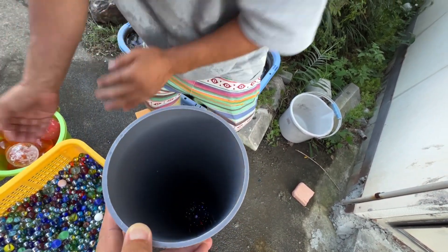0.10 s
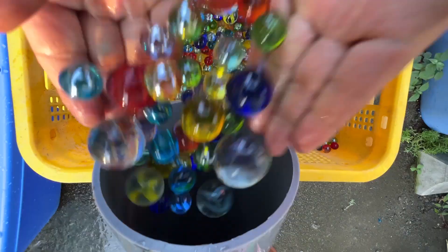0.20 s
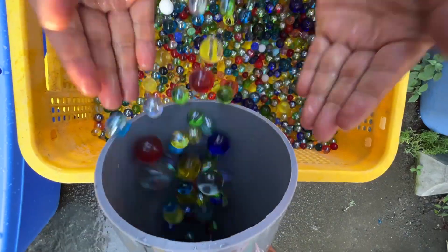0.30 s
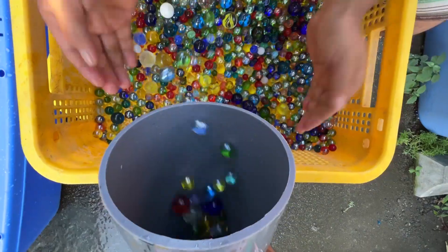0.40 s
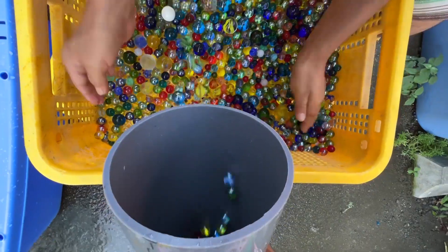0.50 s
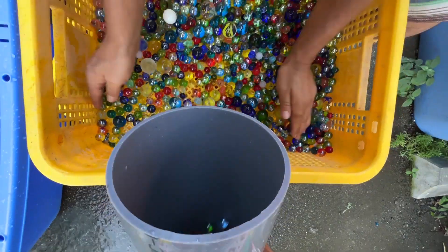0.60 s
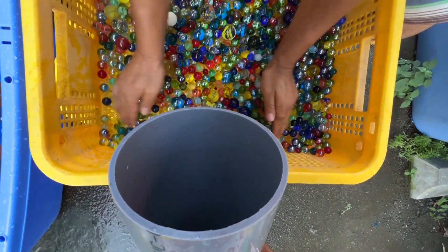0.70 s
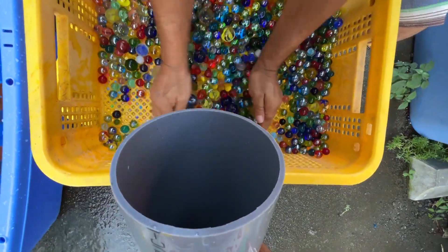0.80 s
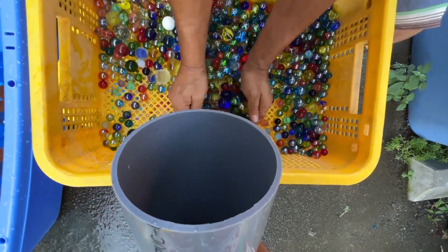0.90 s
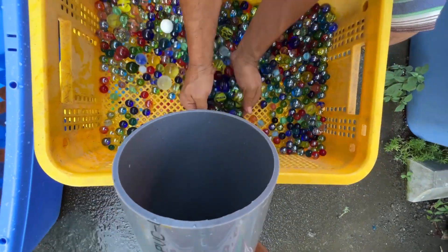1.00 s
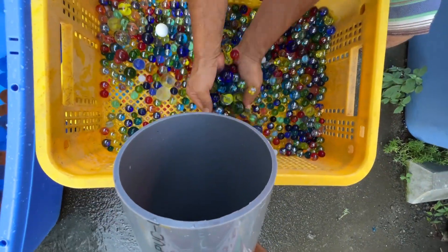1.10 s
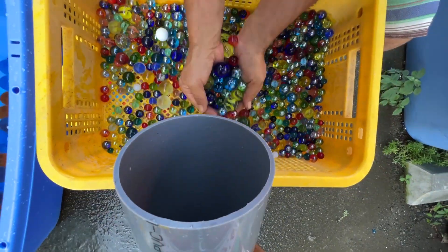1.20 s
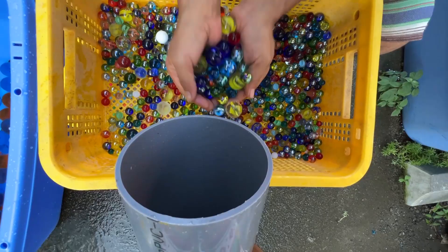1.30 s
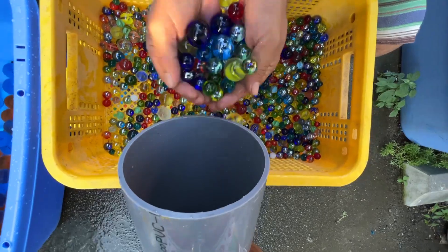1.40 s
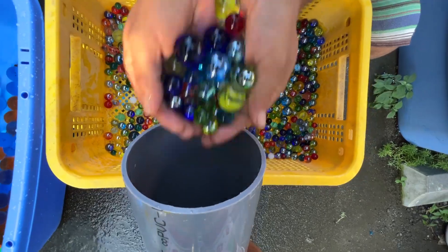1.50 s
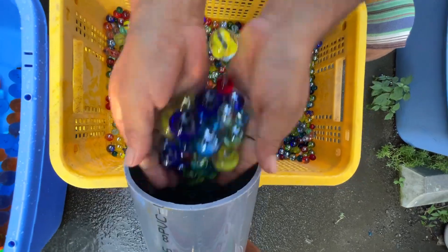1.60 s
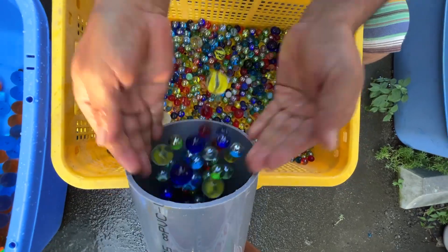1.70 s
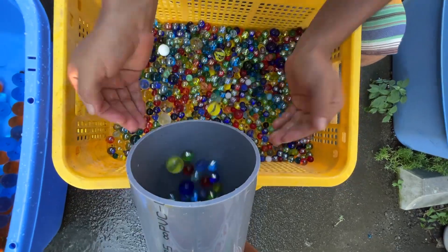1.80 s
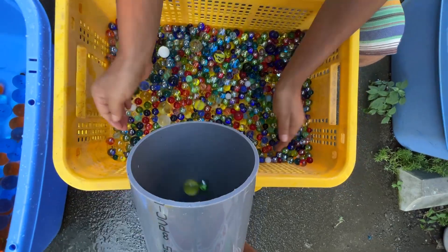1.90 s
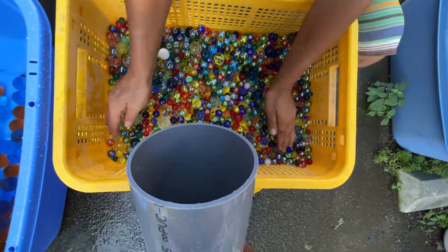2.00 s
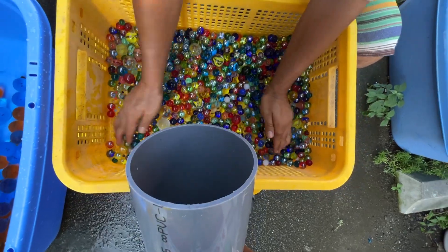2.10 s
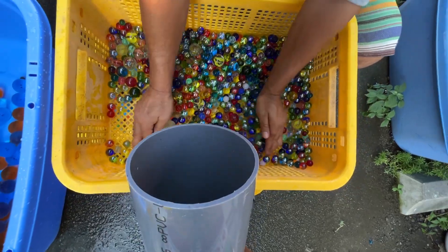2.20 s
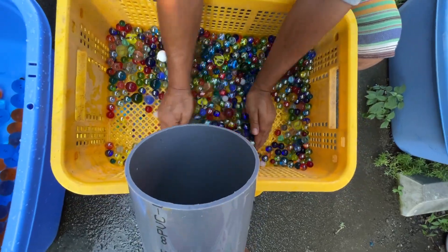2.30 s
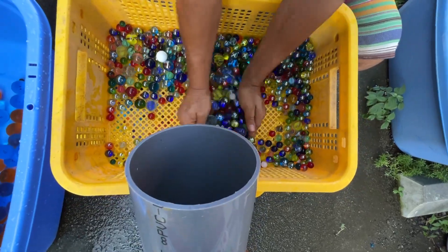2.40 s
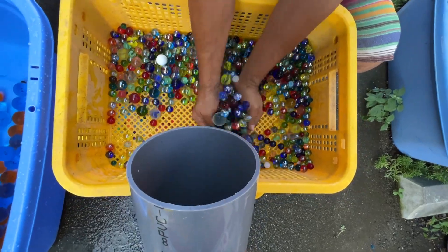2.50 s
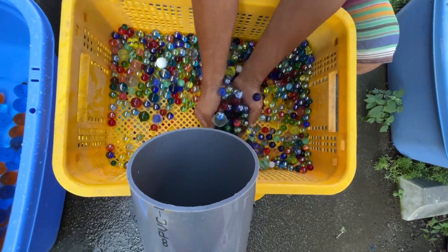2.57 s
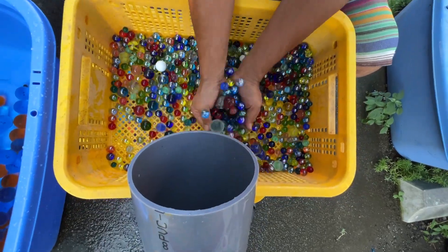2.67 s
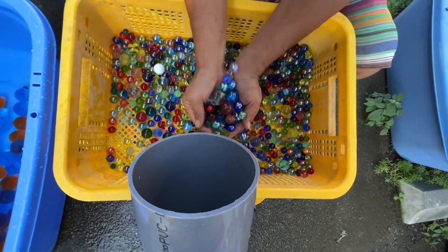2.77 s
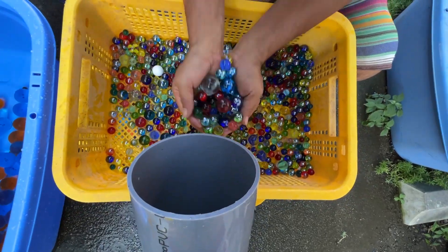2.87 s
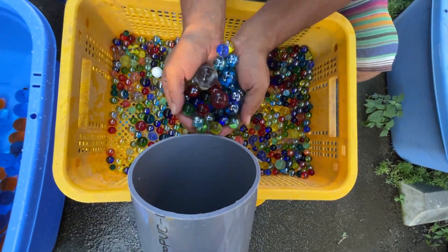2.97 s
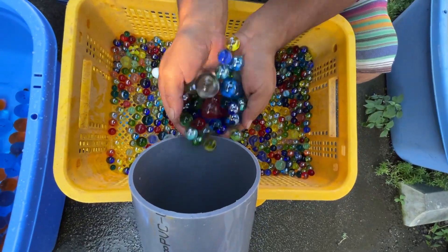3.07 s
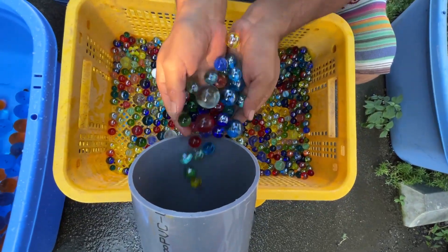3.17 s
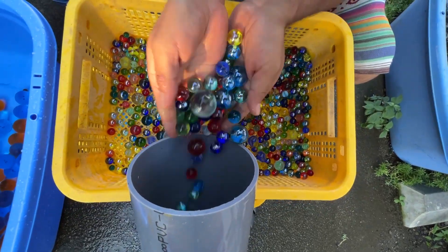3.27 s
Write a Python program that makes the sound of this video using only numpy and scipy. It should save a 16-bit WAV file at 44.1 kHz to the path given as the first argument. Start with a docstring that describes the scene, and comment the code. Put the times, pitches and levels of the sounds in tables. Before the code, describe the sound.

Glass marbles clatter down a plastic pipe and click as hands scoop more from a basket.

```python
"""Glass marbles clatter down a long plastic pipe, two handfuls, striking the wall and each other.
Hands rake more marbles in a plastic basket: glass clicks, the wall rattles, the floor rings.
Ahead of all this, a few marbles rattle far down the pipe, coloured by its air column, then a short silence.
Each source is a spray of hard clicks from several directions, with short tails of near reflections.
Dull knocks, a low rumble and a faint hum sit under the handfuls and the raking."""
import sys
import numpy as np
from scipy import signal
from scipy.fft import rfft, irfft, next_fast_len
from scipy.io import wavfile

SR = 44100
rng = np.random.default_rng(int(sys.argv[2]) if len(sys.argv) > 2 else 0)


def transcribe(u):
    """Save the signal u as a 16-bit wav file named by the first command-line argument.

    u: samples, shape (n,) or (channels, n), limited to [-1, 1]; the rate is SR.
    q: integer samples, one column per channel.
    """
    v = np.clip(np.atleast_2d(u).T, -1, 1)
    q = np.round(v * 32767).astype(np.int16)
    wavfile.write(sys.argv[1], SR, q)


N = 145530
TIME = np.arange(N) / SR
SIZE = next_fast_len(N + SR // 2)
HZ = np.maximum(np.arange(SIZE // 2 + 1) * SR / SIZE, 1)

# Clatter envelopes, one per handful: (time [s], level [dB])
HANDFULS = [
    [(0.232, -67), (0.241, -33), (0.276, -28), (0.286, -46), (0.297, -44), (0.314, -28), (0.322, -15.5),
     (0.39, -25), (0.398, -19), (0.41, -22), (0.43, -25), (0.438, -17), (0.49, -24.5), (0.52, -21),
     (0.71, -31), (0.726, -25.5), (0.768, -39), (0.8, -36)],
    [(1.742, -56), (1.745, -26), (1.756, -40), (1.778, -20), (1.805, -26), (1.84, -22), (1.872, -38),
     (1.882, -24.5), (1.95, -24), (2.1, -28), (2.116, -40), (2.127, -29), (2.3, -47)],
]
# Accents, single marbles on the pipe wall: (time [s], peak [dB], ring [Hz])
PIPE_STRIKES = [(0.227, -17.5, 5600), (0.2364, -30, 5400), (0.2412, -2.5, 4100), (0.2524, -9.5, 3780),
                (0.2629, -8, 3500), (0.2696, 0, 4330), (0.2988, -6, 4330), (0.305, -3.5, 4400),
                (0.3219, -17, 2930), (0.3381, -1.5, 3950), (0.351, -1, 4550), (0.3613, 0, 5700),
                (0.3757, -13, 4200), (0.4368, -17, 2780), (0.4414, -7, 3680), (0.4566, -1.5, 3330),
                (0.5281, -1, 4100), (0.68, -18, 3960), (0.6892, -11, 2610), (0.7233, -10, 4130),
                (0.7369, -6.5, 5300), (1.7442, -7.5, 3730), (1.7712, -6, 2760), (1.7856, -2, 3080),
                (1.8167, -11.5, 3210), (1.831, -9, 3210), (1.8372, -12.5, 3830), (1.8615, -7, 3040),
                (1.8847, -7, 3830), (1.8916, -12, 3190), (1.9153, -10, 3790), (1.942, -4, 4060),
                (1.9695, -5, 2580), (1.9931, 2, 3100), (2.0486, -7.5, 3630), (2.055, -6, 2480),
                (2.1573, -19, 3880), (2.195, -11.5, 3640)]
# Bright tone of the clatter: (frequency [Hz], level [dB])
PIPE_EQ = [(60, -45), (220, -16), (400, -19.5), (690, -14.5), (1400, -8.5), (2500, 0), (3600, 2),
           (5200, 1.5), (7000, -2), (16000, -3)]
# Its stereo image: (frequency [Hz], left minus right [dB])
PIPE_PAN = [(120, 2), (240, -3), (480, 9.5), (950, 1), (1890, -5), (3770, 7.5), (7520, -3.5), (15000, 0)]


def pipe_clatter(sink_s=.2, sink_share=.4):
    """Falling marbles hit the wall and each other; the clatter rings lower as they sink into the pipe."""
    first, second = HANDFULS
    clicks = (envelope(first) + envelope(second)) * swarm(1500, spread_db=3, clump_db=1.5)
    poured_at = np.where(TIME < second[0][0], first[0][0], second[0][0])
    depth = np.clip((TIME - poured_at) / sink_s, 0, 1)
    pitch_place = sink_share * (1 - depth) + (1 - sink_share) * rng.random(N)
    strikes = ringing_hits(PIPE_STRIKES, directions=12, ring_db=-7, ring_s=.003)
    return radiate(clicks, PIPE_EQ, PIPE_PAN, hits=strikes, tail_s=.022, tail_db=-5, lag_s=.000351,
                   scatter_s=.0002, ring=(2200, 5500, 1140, 1.8), place=pitch_place, directions=12)


# Raking envelopes: (time [s], glass level [dB], basket wall level [dB])
RAKING = [(0.225, -55, -70), (0.242, -31, -44), (0.275, -30, -39), (0.293, -46, -50), (0.3, -27, -41),
          (0.33, -25, -34), (0.42, -21.5, -36.5), (0.45, -19.5, -32.5), (0.64, -25, -37),
          (1.01, -22.5, -37.5), (1.58, -40.5, -45.5), (1.62, -44.5, -66), (1.64, -32, -37.5),
          (1.7, -41, -50), (1.78, -26, -33), (1.87, -30.5, -37.5), (1.93, -20, -34), (2.06, -28, -39),
          (2.3, -25, -39), (2.5, -20.5, -36), (2.56, -26, -40), (3.05, -39, -45), (3.16, -37, -49),
          (3.17, -34, -56), (3.27, -39.5, -43.5), (3.3, -45, -50)]
# Accents, glass on glass: (time [s], peak [dB], send to the basket wall [dB])
GLASS_CLACKS = [(1.0299, 0.5, -33), (1.3507, -14, -18), (1.386, -7, -13), (1.4769, -29, -25),
                (1.5182, -18, -30), (1.5599, -12, -40), (1.5852, -23, -30), (1.639, -5, -17),
                (1.643, -12.5, -14), (1.6673, -14, -35), (2.3889, -8, -24), (2.6012, -23, -32),
                (2.7912, -24, -16), (2.8855, -20, -6), (2.9015, -32, -19), (2.920, -16.5, -7.5),
                (2.950, -23, -30), (2.9805, -15.5, -24), (3.0026, -5.5, -21), (3.0344, -15, -21),
                (3.1395, -17, -15), (3.1664, -17, -35), (3.174, -14.5, -32), (3.2022, -10, -17.5),
                (3.2462, -14.5, -14), (3.265, -13, -9.5)]
# Crisp tone of the glass: (frequency [Hz], level [dB])
GLASS_EQ = [(300, -48), (900, -38.5), (1600, -34), (2500, -16.5), (5900, -12.5), (7000, -11),
            (16000, -12.5)]
# Stereo image of the basket and its marbles: (frequency [Hz], left minus right [dB])
BASKET_PAN = [(110, 11), (200, 3.5), (380, 3.5), (700, 7), (1290, 2), (2380, 0.5), (4400, 2), (8120, -6.5),
              (15000, 1)]


def raked_glass(rebound_s=.004, rebound_db=-5):
    """Raked marbles click together; each clack is a first touch and four quick, softer rebounds."""
    clicks = envelope(RAKING) * swarm(4000, spread_db=4, clump_db=1)
    times, peak_db, _ = np.transpose(GLASS_CLACKS)
    chance = rng.random((len(times), 8)).T
    clacks = impacts(times, peak_db)
    for lateness, polarity in zip(chance[:4], np.sign(chance[4:] - .5)):
        touch_db = peak_db + rebound_db * (1 + 2 * lateness)
        clacks += impacts(times + rebound_s * lateness, touch_db, signs=polarity)
    return radiate(clicks, GLASS_EQ, BASKET_PAN, hits=clacks, tail_s=.045, tail_db=-1,
                   lag_s=.0002725, scatter_s=.000273, ring=(2560, 12700, 530, .1))


# Midrange body of the plastic wall: (frequency [Hz], level [dB])
WALL_EQ = [(40, -69), (120, -25.5), (155, -13.5), (372, -8), (460, -11.5), (660, -5), (950, -4.5),
           (1490, -3), (1750, -0.5), (3000, -5.5), (3900, -8.5), (6000, -31), (15000, -37)]


def basket_wall():
    """The wall rattles with the raking and answers each clack, ringing in narrow bands."""
    times, peak_db, send_db = np.transpose(GLASS_CLACKS)
    clicks = envelope(RAKING, column=2) * swarm(900, spread_db=2)
    knocks = impacts(times, peak_db + send_db)
    return radiate(clicks, WALL_EQ, BASKET_PAN, hits=knocks, tail_s=.035, tail_db=.5,
                   lag_s=.00035, scatter_s=.00013, ring=(544, 1905, 30, 12.4), directions=16)


# Swells, one per scoop: (time [s], level [dB])
SCOOP_SWELLS = [
    [(0.75, -52), (0.934, -39.5), (1.15, -53)],
    [(2.28, -45), (2.504, -35.5), (2.62, -63)],
]
# Nasal tone of the basket floor: (frequency [Hz], level [dB])
FLOOR_EQ = [(500, -43), (1000, -10), (1300, 0), (1500, -10), (1720, -1.5), (2100, -4.5), (5000, -53)]


def basket_floor():
    """The floor rings as hands plough the marbles along it, twice."""
    clicks = sum(envelope(scoop) for scoop in SCOOP_SWELLS) * swarm(1500, spread_db=.5)
    return radiate(clicks, FLOOR_EQ, BASKET_PAN, tail_s=.015, tail_db=-1,
                   lag_s=.00028, scatter_s=.0002, ring=(1100, 2000, 122, 2.5), directions=12)


# Envelope of the rattle far down the pipe: (time [s], level [dB])
DEEP_ENVELOPE = [(0.0, -35.5), (0.026, -33), (0.036, -35.5), (0.164, -39), (0.2, -46.5)]
# Accents, single marbles landing: (time [s], peak [dB], ring [Hz])
DEEP_LANDINGS = [(0.003, -25, 1810), (0.035, -26.5, 4180), (0.0423, -24.5, 4130), (0.0688, -23, 1870),
                 (0.0903, -28.5, 674), (0.1, -26, 1680), (0.1247, -31, 600)]
# Hollow tone of the rattle: (frequency [Hz], level [dB])
DEEP_EQ = [(18, -50), (30, -18), (131, -13), (180, -14), (218, -9), (340, -19.5), (384, -18), (627, -8.5),
           (4140, -15), (5980, -18), (9520, -31.5), (10500, -85), (13600, -108), (22000, -120)]
# Its stereo image: (frequency [Hz], left minus right [dB])
DEEP_PAN = [(60, -3), (110, 21), (200, 8), (380, 15), (700, 6), (1290, 0), (2380, 10), (4400, -1.5),
            (8120, 1.5), (15000, -2)]
PIPE_HZ = 43.43   # air column closed at the far end: odd multiples ring


def deep_rattle(pipe_t60_s=1, damping_hz=520, comb_delay_s=.000585, comb_from_hz=4200):
    """Marbles land far down; the echo runs up and down the pipe, flipping polarity each round trip."""
    clicks = envelope(DEEP_ENVELOPE) * swarm(3000, spread_db=4.5)
    landings = ringing_hits(DEEP_LANDINGS, directions=6, ring_db=-11.5, ring_s=.01)
    rattle = radiate(clicks, DEEP_EQ, DEEP_PAN, hits=landings, tail_s=.046, tail_db=6.5,
                     lag_s=.000357, scatter_s=.000365, directions=6)
    round_trip_s = 1 / (2 * PIPE_HZ)
    feedback = from_db(-60 * round_trip_s / pipe_t60_s) / (1 + (HZ / damping_hz) ** 2)
    resonance = np.sqrt(1 - feedback ** 2) / (1 + feedback * delay(round_trip_s))
    # Evenly spaced dips hollow out the treble.
    treble_comb = 1 - .69 / (1 + (comb_from_hz / HZ) ** 4) * delay(comb_delay_s)
    return rattle * treble_comb * resonance


def air_column(level_db=-45.5, t60_s=.86):
    """The pipe's fifth harmonic dies away, still ringing from earlier marbles."""
    return from_db(level_db - 60 * TIME / t60_s) * np.sin(2 * np.pi * 5 * PIPE_HZ * TIME)


# Knocks on the plastic: (time [s], peak [dB], ring [Hz])
KNOCKS = [(0.32, -36.5, 190), (0.453, -24.5, 217), (0.569, -35, 283), (1.246, -37, 277), (1.384, -40, 315),
          (1.643, -34.5, 207), (1.781, -34, 280), (1.913, -38, 272), (2.042, -44, 267), (2.919, -43, 318),
          (3.005, -39.5, 282), (3.203, -42.5, 320)]
# Their boxy tone: (frequency [Hz], level [dB])
KNOCK_EQ = [(40, -42), (150, -10.5), (260, 3.5), (420, -2.5), (700, -17.5), (2000, -34)]


def plastic_knocks():
    """Knocked plastic gives a dull thump with a short, low ring."""
    knocks = ringing_hits(KNOCKS, directions=4, ring_db=-39, ring_s=.02)
    return radiate(np.zeros(N), KNOCK_EQ, pan=[(60, 2.2), (700, 1.6)], hits=knocks, tail_s=.045,
                   tail_db=-5, tail_cut_hz=100, lag_s=.0001, scatter_s=.0001, directions=4)


# Rumble envelope: (time [s], level [dB])
RUMBLE_ENVELOPE = [(0.22, -56), (0.42, -43.5), (0.48, -52), (0.58, -51), (0.78, -65.5), (1.7, -62.5),
                   (1.9, -53), (2.1, -64), (3.3, -67)]
# Its bass weight: (frequency [Hz], level [dB])
RUMBLE_EQ = [(15, -52), (35, -20), (55, -12.5), (90, 0), (135, -8.5), (200, -6), (300, -9), (500, -35)]


def rumble():
    """Small impacts blur into a low rumble through pipe and basket."""
    clicks = envelope(RUMBLE_ENVELOPE) * swarm(300, spread_db=2.5)
    return radiate(clicks, RUMBLE_EQ, pan=[(30, -6), (200, 7)], tail_s=.082, tail_db=-6,
                   tail_cut_hz=3, lag_s=.0001, scatter_s=.0003, directions=4)


def hum(pitch_hz=120, level_db=-67):
    """A faint, steady low tone."""
    return from_db(level_db) * np.sin(2 * np.pi * pitch_hz * TIME)


def from_db(db):
    """Decibels to gain."""
    return 10 ** (np.asarray(db) / 20)


def envelope(rows, column=1):
    """Gain over time from a table column; silent outside the table."""
    rows = np.array(rows)
    return from_db(np.interp(TIME, rows[:, 0], rows[:, column], left=-200, right=-200))


def curve_db(points):
    """An EQ or pan table read at every frequency."""
    hz, db = np.transpose(points)
    return np.interp(np.log(HZ), np.log(hz), db)


def delay(seconds):
    """Frequency response of a pure delay."""
    return np.exp(-2j * np.pi * HZ * seconds)


def minimum_phase(db):
    """Frequency response of an EQ that never rings ahead of the hit."""
    cepstrum = irfft(db * np.log(10) / 20, SIZE)
    cepstrum[..., 1:SIZE // 2] *= 2
    cepstrum[..., SIZE // 2 + 1:] = 0
    return np.exp(rfft(cepstrum))


def swarm(per_s, spread_db, clump_db=0, clumps_per_s=60):
    """Random clicks of uneven size, rms 1; clump_db makes them surge in clumps."""
    sizes = from_db(spread_db * np.minimum(rng.exponential(1, N), 4)) * rng.choice([-1, 1], N)
    knots = rng.standard_normal(int(N / SR * clumps_per_s) + 2)
    clumps = from_db(clump_db * np.interp(TIME * clumps_per_s, np.arange(len(knots)), knots))
    clicks = sizes * clumps * (rng.random(N) < per_s / SR)
    return clicks / np.sqrt(np.mean(clicks ** 2))


def impacts(times, db, ring_hz=None, ring_db=-12, ring_s=.006, signs=None):
    """Single clicks on cue; with ring_hz, each rings briefly at its own pitch."""
    track, t = np.zeros(N + SR), np.arange(SR // 40) / SR
    for k, start in enumerate((times * SR).astype(int)):
        track[start] += from_db(db[k]) * (1 if signs is None else signs[k])
        if ring_hz is not None:
            decay = from_db(db[k] + ring_db - 60 * t / ring_s)
            track[start:start + len(t)] += decay * np.sin(2 * np.pi * ring_hz[k] * t)
    return track[:N]


def ringing_hits(rows, directions, **ring):
    """Ringing impacts dealt in turn onto one track per direction."""
    return np.array([impacts(*np.transpose(rows[k::directions]), **ring) for k in range(directions)])


def radiate(clicks, eq, pan, tail_s, tail_db, lag_s, scatter_s, hits=0, ring=None, tail_cut_hz=500,
            place=None, directions=8):
    """Stereo spectrum of clicks and hits; each direction has its own lag, reflections and optional ring."""
    body = minimum_phase(curve_db(eq) + np.array([[.5], [-.5]]) * curve_db(pan))
    pulse = irfft(body, SIZE)
    t = np.arange(SR // 8) / SR
    decay = from_db(-60 * t / tail_s) * (t > .0004)
    rms_gain = np.sqrt(np.mean(np.sum(pulse ** 2, axis=1)) * (1 + from_db(2 * tail_db)))
    # Place, 0 to 1, picks a click's direction and with it the ring pitch, low to high.
    direction = (directions * (rng.random(N) if place is None else place)).astype(int)
    mix = 0
    for k in range(directions):
        reflections = from_db(tail_db) * rng.standard_normal((2, len(t))) * decay / np.linalg.norm(decay)
        tail = rfft(reflections, SIZE) * HZ ** 2 / (HZ ** 2 + tail_cut_hz ** 2)
        right_lag_s = lag_s + scatter_s * rng.uniform(-1.18, 1)
        direct = delay(np.array([[0], [right_lag_s]]))
        grains = rfft(clicks * (direction == k), SIZE) / rms_gain
        if ring:
            low_hz, high_hz, width_hz, gain_db = ring
            centre_hz = low_hz * (high_hz / low_hz) ** ((k + rng.random()) / directions)
            grains *= 1 + from_db(gain_db) / (1 + 1j * (HZ - centre_hz ** 2 / HZ) / width_hz)
        hit_track = hits[k] if np.ndim(hits) == 2 else hits * (direction == k)
        accents = rfft(hit_track, SIZE) / np.abs(pulse).max()
        mix += (grains + accents) * (direct + tail)
    return mix * body


# Treble peaks and notches shared by the close sounds: (frequency [Hz], gain [dB])
CLOSE_EQ = [(6800, 0.5), (7600, 3), (8200, 8), (9300, 0.5), (10100, -11), (11600, 0.5), (12900, -5.5),
            (13500, -21), (14200, -43), (14600, -3.5), (15700, 1), (16000, -43), (17000, -73)]


def scene(silence_from_s=.201, silence_to_s=.2255):
    """The deep rattle cuts to a short silence; then pipe clatter and basket come in over the hum."""
    deep = irfft(deep_rattle(), SIZE)[:, :N] + air_column()
    close_bus = pipe_clatter() + raked_glass() + basket_wall() + basket_floor()
    close_bus += plastic_knocks() + rumble()
    close = irfft(close_bus * minimum_phase(curve_db(CLOSE_EQ)), SIZE)[:, :N] + hum()
    fade_out = np.clip((silence_from_s - TIME) / .0016 + 1, 0, 1)
    fade_in = np.clip((TIME - silence_to_s) / .001, 0, 1)
    return deep * fade_out + close * fade_in


def record(dry, drive=1.484, low_cut_hz=20, high_cut_hz=16900):
    """Soft saturation rounds the peaks; the deepest bass and the very top are cut."""
    low_cut = signal.butter(2, low_cut_hz, "high", fs=SR, output="sos")
    high_cut = signal.cheby2(12, 90, high_cut_hz, fs=SR, output="sos")
    return signal.sosfilt(high_cut, signal.sosfilt(low_cut, np.tanh(drive * dry)))


dry = scene()
out = record(dry)
transcribe(out)
```